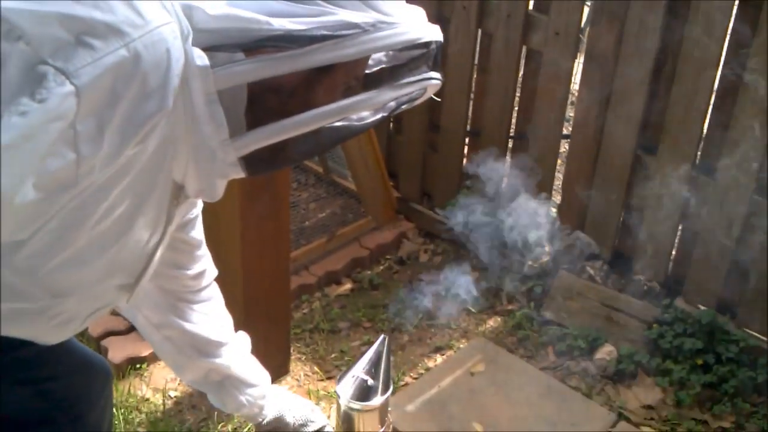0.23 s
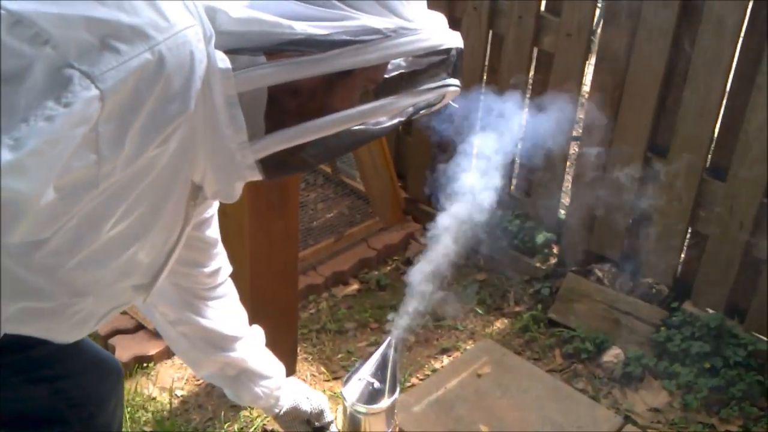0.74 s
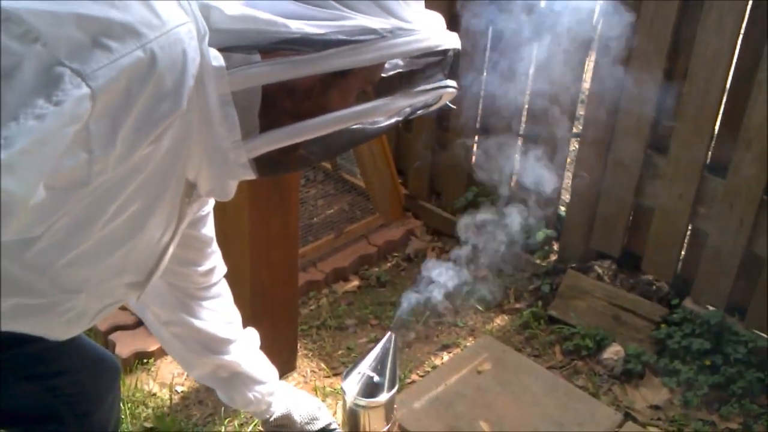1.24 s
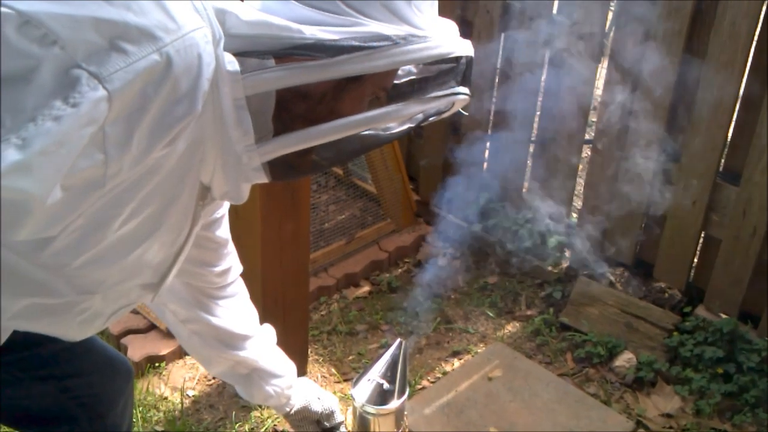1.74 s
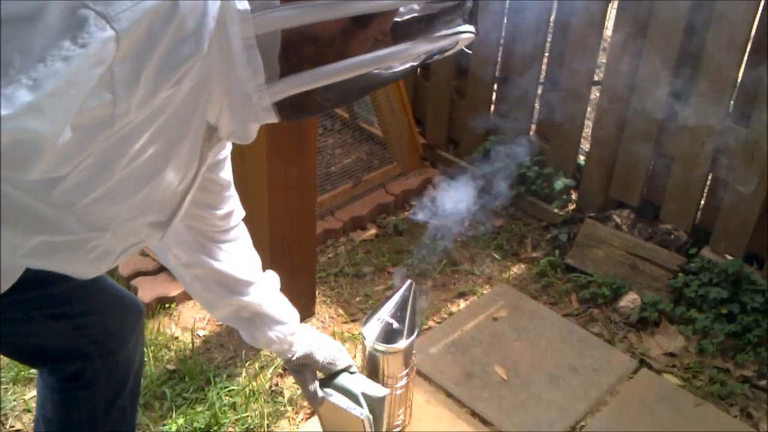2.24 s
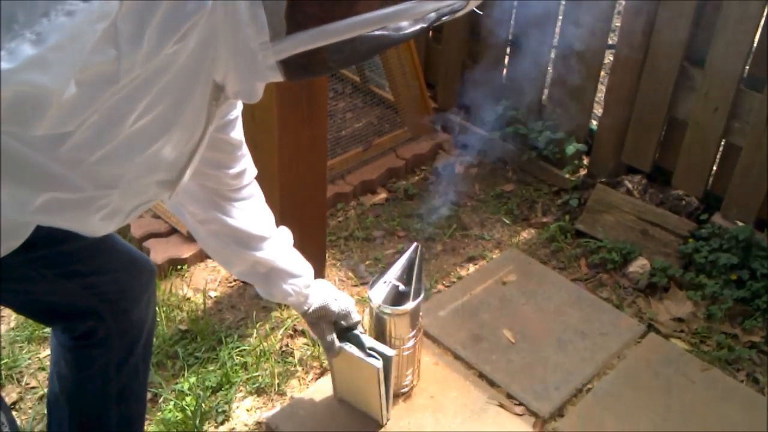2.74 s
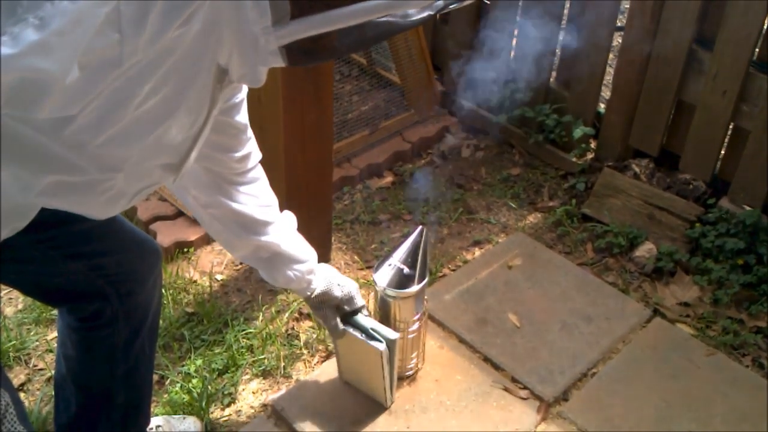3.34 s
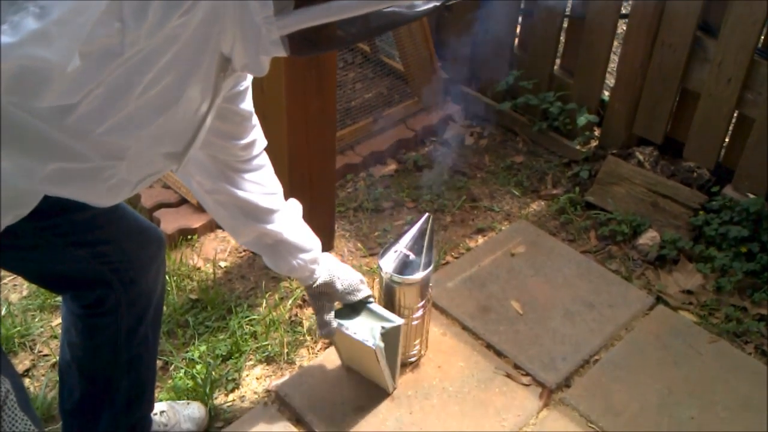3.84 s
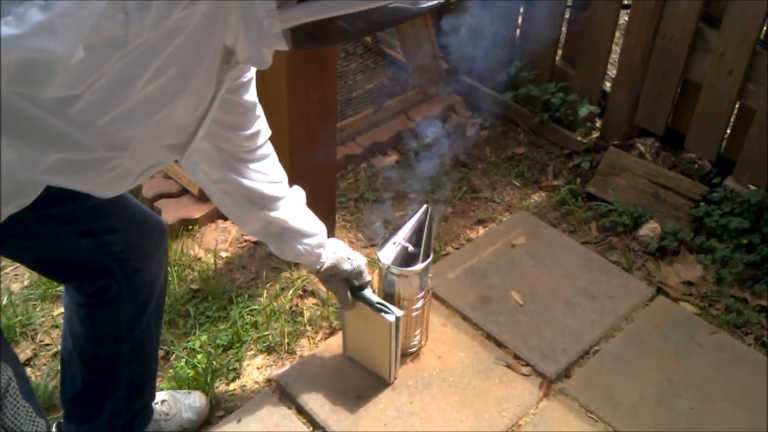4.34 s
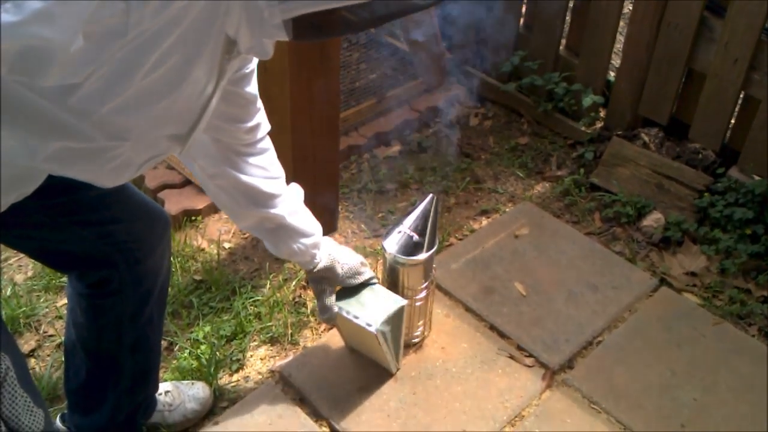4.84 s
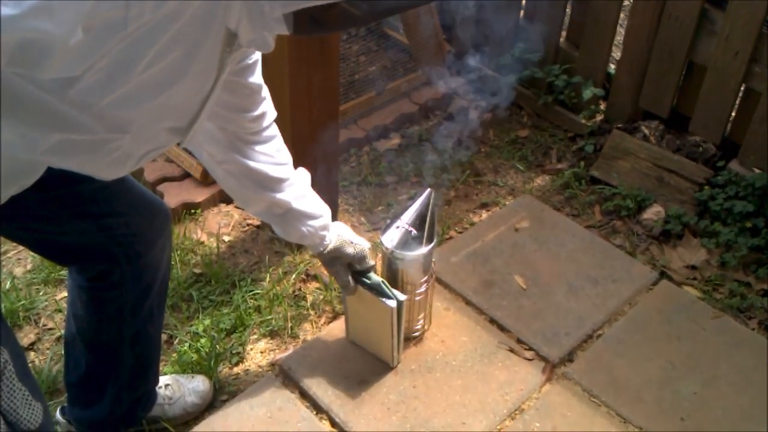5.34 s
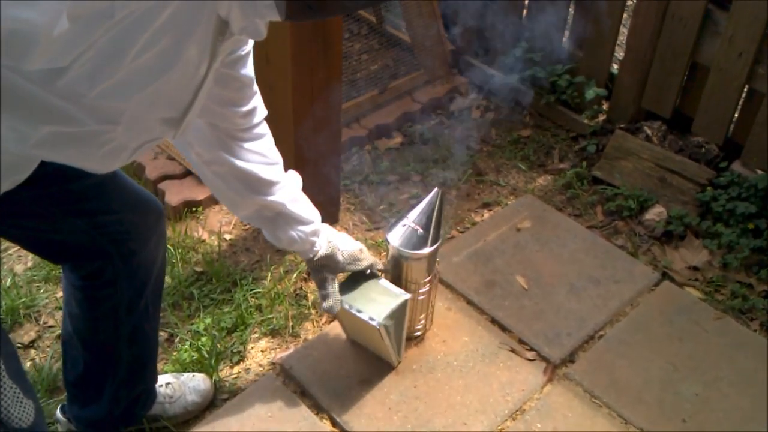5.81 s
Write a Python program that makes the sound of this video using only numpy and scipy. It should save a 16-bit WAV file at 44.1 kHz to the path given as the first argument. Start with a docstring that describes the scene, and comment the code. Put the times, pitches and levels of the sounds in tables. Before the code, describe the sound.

A hand bellows huffs breathy, hollow puffs of air outdoors, with hissing refills, stiff crackly snaps, tinny scrapes on stone and dull board knocks.

```python
"""A bee smoker is pumped in a fenced yard, over a low outdoor rumble that at times dips abruptly.
A squeeze is already under way: turbulent air hums in the can, roars in the spout and hisses through the fuel.
At once the can scrapes on a paving slab and rings modally, stiff folds snap and crinkle, and the boards knock.
Then the spring reopens the bellows, which hiss as they refill, and squeeze and refill alternate.
The lid buzzes early and again later; the wire guard rings once near the start; stick-slip creaks follow."""
import sys
import numpy as np
from scipy import signal
from scipy.fft import rfft, irfft, next_fast_len
from scipy.io import wavfile
from scipy.ndimage import map_coordinates

SR = 44100
rng = np.random.default_rng(int(sys.argv[2]) if len(sys.argv) > 2 else 0)


def store_wav(level_fs):
    """Save 16-bit WAV to argv[1]."""
    pcm = np.round(np.clip(np.atleast_2d(level_fs), -1, 1) * 32767)
    wavfile.write(sys.argv[1], SR, pcm.T.astype(np.int16))


N = 267731  # samples


def amp(db):
    """Level: amplitude ratio of a value in dB."""
    return 10 ** (np.asarray(db) / 20)


def unit(x):
    """Normalisation: x at rms 1."""
    return x / np.sqrt(np.mean(x ** 2) + 1e-20)


def along(points, hz):
    """Interpolation of (f/Hz, value) points on a logarithmic frequency axis."""
    f, v = np.transpose(points)
    return np.interp(np.log(hz + 1), np.log(f + 1), v)


def curve(rows):
    """Linear interpolation of (t/s, value) rows, one value per sample."""
    return np.interp(np.arange(N) / SR, *np.transpose(rows))


def wobble(rate):
    """Random modulation: a smooth curve through rate random knots a second."""
    knots = rng.standard_normal(int(N * rate / SR) + 4)
    return map_coordinates(knots, [np.arange(N) * rate / SR])


def filtered(x, response):
    """Linear filtering: the spectrum of x times a complex response of frequency."""
    m = next_fast_len(len(x) + SR // 4)
    hz = np.fft.rfftfreq(m, 1 / SR)
    return irfft(rfft(x, m) * response(hz), m)[:len(x)]


def coloured(x, spectrum):
    """Spectral shaping by (f/Hz, level/dB) points, at rms 1."""
    return unit(filtered(x, lambda hz: amp(along(spectrum, hz))))


def resonant(x, peaks):
    """Parallel second-order resonators, (f/Hz, width/Hz, level/dB) each."""
    def response(f):
        return sum(amp(db) * 1j * f * w / (c * c - f * f + 1j * f * w) for c, w, db in peaks)
    return filtered(x, response)


def noise():
    """White Gaussian noise."""
    return rng.standard_normal(N)


def grains(rate, spread_db):
    """Random impulse process: tiny impacts of random size and sign, rate a second, at rms 1."""
    struck = rng.random(N) < rate / SR
    sign = rng.choice([-1, 1], N)
    return unit(struck * sign * amp(spread_db * np.clip(noise(), -2, 2)))


def add(track, s, sound):
    """Superposition: mix a sound into the track at time s."""
    part = track[round(s * SR):][:len(sound)]
    part += sound[:len(part)]


def stroke(length, t60, rise):
    """Exponential envelope: it rises, holds for a length and dies away."""
    t = np.arange(SR // 2) / SR
    return (1 - np.exp(-t / rise)) * amp(-60 * np.maximum(t - length, 0) / t60)


def burst(hz, width, t60, seconds):
    """Damped resonance: a dying noise burst round hz, at rms 1 over its first seconds."""
    band = [(hz, width, 0)]
    decay = stroke(0.0019, t60, rise=0.00026)
    excitation = decay * rng.choice([-1., 1.], len(decay))
    sound = resonant(resonant(excitation, band), band)
    return sound / np.sqrt(np.mean(sound[:round(seconds * SR)] ** 2))


def ringing(modes):
    """Modal superposition: half a second of damped sines, at rms 1 over the first 10 ms."""
    t = np.arange(SR // 2) / SR
    sound = 0
    for hz, db, t60 in modes:
        phase = rng.random()
        # dividing by sqrt(t60) gives modes of equal table level equal energy
        sound = sound + amp(db - 60 * t / t60) / np.sqrt(t60) * np.sin(2 * np.pi * (hz * t + phase))
    return sound / np.std(sound[:SR // 100])


SPEED_POWER = 4.38  # sound pressure grows as this power of the air speed


def gust(start, length, peak):
    """Aeroacoustic power law: air speeds up, peaks and comes to rest; sound pressure is a power of its speed."""
    done = np.clip((np.arange(N) / SR - start) / length, 0, 1)
    skew = np.log(.5) / np.log(peak)  # puts the top of the sine at this share of the stroke
    return np.abs(np.sin(np.pi * done ** skew)) ** SPEED_POWER


# spectrum of the outdoor rumble: f/Hz, relative level per Hz/dB
YARD_SPECTRUM = [(15, -30.5), (30, -7.5), (57, -1.5), (90, -7), (150, -5.5), (300, -12.5), (450, -10.5),
                 (600, -16), (1000, -18), (1400, -23), (2200, -28), (4000, -32), (6600, -23.5),
                 (8000, -34.5)]
# course of the rumble, whose departures from its mean are scaled by the swing: t/s, level/dB
RUMBLE_COURSE = [(0.0, -41.5), (0.03, -39), (0.1, -46), (0.96, -41.5), (1.32, -51.5), (1.69, -44),
                 (3.2, -43.5), (3.26, -54), (3.53, -47.5), (3.57, -57.5), (3.99, -46.5), (5.29, -43.5),
                 (5.95, -48.5), (6.07, -44)]
YARD_DB, YARD_SWING = -42, 0.74  # mean level/dB; share of the course's departures that is followed


def yard():
    """Noise with a changing level: a low outdoor rumble that at times dips abruptly."""
    rumble_db = curve(RUMBLE_COURSE)
    swing_db = YARD_SWING * (rumble_db - rumble_db.mean())
    return coloured(noise(), YARD_SPECTRUM) * amp(YARD_DB + swing_db + 0.26 * wobble(9))


# squeezes of the bellows by hand: start t/s, length/s, peak flow level/dB, ceiling of the can's hum/dB,
# both before the source gains and the effect of force
SQUEEZES = [(-.25, 0.53, -40, -39), (0.416, 1.0, -44, -35), (1.556, 0.77, -39.5, -35.5),
            (2.466, 0.7, -32.5, -36.5), (3.451, 0.59, -35, -40.5), (4.373, .48, -28, -36),
            (5.249, 0.41, -25, -36.5)]
# turbulence of the jet: f/Hz, relative level per Hz/dB
JET_SPECTRUM = [(120, -33.5), (250, -2), (360, -1.5), (450, -3.5), (800, -1.5), (1400, -2.5), (2000, -12),
                (3100, -13.5), (4200, -6), (8000, -25)]
# resonances of can and spout in the air stream: f/Hz, width/Hz, relative level/dB
SPOUT_RESONANCES = [(703, 18, -7.5), (804, 110, 1.5), (870, 35, -3.5), (1032, 32, 1), (1173, 48, -7),
                    (1323, 43, -2), (1408, 27, -2.5), (1558, 21, -15), (1691, 44, -5), (1880, 49, -4.5),
                    (1956, 23, -5.5), (2173, 50, -11.5), (2500, 94, -7.5), (3720, 87, -12),
                    (4197, 42, -2.5)]
# air passing through the smouldering fuel: f/Hz, relative level per Hz/dB
FUEL_SPECTRUM = [(2000, -41), (3300, -29), (4150, -12), (4700, -7.5), (5400, -0.5), (6300, 4.5), (7100, 7),
                 (7600, 5), (8200, -27)]
# air in the can, bouncing on the spout: f/Hz, width/Hz, relative level/dB
CAVITY_RESONANCE = [(271.5, 34.3, 0)]
SQUEEZE_PEAK = 0.31  # share of a squeeze gone by when the air is fastest
HUM_ONSET_DB, FIRM_DB = -49.5, -26.5  # flow levels/dB: half drive of the hum, and a firm squeeze
HUM_GROWS, HISS_GROWS = .11, .22  # dB per dB of flow: the hum, and the hiss over the roar


def puffs():
    """Turbulent jet and Helmholtz resonance: the flow roars, hisses and hums, brighter when squeezed harder."""
    flow = amp(-120)  # a trace of flow keeps the logarithm finite
    humming = 0
    for start, length, db, hum_db in SQUEEZES:
        puff = amp(db) * gust(start, length, SQUEEZE_PEAK)
        # the cavity answers even a gentle flow and grows little beyond that
        drive = (puff / amp(HUM_ONSET_DB)) ** 1.55
        flow = flow + puff
        humming = humming + amp(hum_db) * drive / (1 + drive)
    force_db = 20 * np.log10(flow) - FIRM_DB

    jet = amp(-1.24) * coloured(noise(), JET_SPECTRUM)
    spout = amp(-1.5) * unit(resonant(noise(), SPOUT_RESONANCES))
    roar = jet + spout
    fuel = coloured(noise() + .5 * grains(1500, 3.3), FUEL_SPECTRUM)
    hiss = fuel * amp(3.5 + HISS_GROWS * force_db + 1.1 * wobble(40))
    hum = unit(resonant(noise(), CAVITY_RESONANCE)) * humming * amp(HUM_GROWS * force_db)
    return (roar + hiss) * flow * amp(1.44 * wobble(25)) + hum


def fabric(slips):
    """Band-pass resonance of the stiff fabric, excited by tiny slips, at rms 1."""
    band = [(6370, 2800, 0.0048)]  # f/Hz, width/Hz of each pass, level/dB
    return unit(resonant(resonant(slips, band), band))


def stray_ticks():
    """Random impulsive excitation: faint stray creases tick in the fabric."""
    return amp(-58.5) * fabric(grains(30, 4))


# the can's rim drags on the slab: t/s, level/dB, length/s, t60/s, weight of the low tones/dB;
# the level applies before the weighting
SCRAPES = [(0.041, -26, 0.0083, 0.065, -11), (0.052, -19.5, 0.0088, 0.055, 1.5),
           (0.066, -16.5, 0.021, 0.23, -3.5), (0.2434, -26, 0.0099, 0.093, -5.5),
           (0.277, -25, 0.035, 0.12, -1), (0.34, -25, 0.016, 0.17, -2), (2.489, -20, 0.0076, 0.061, -3.5),
           (2.5, -15.5, 0.01, 0.11, -6)]
# modes of the tin can: f/Hz, relative energy level/dB, t60/s
TIN_MODES = [(476.6, -12.5, 0.23), (746, -2.5, 0.1), (1319, 3, 0.09), (1770, -3.5, 0.42), (2070, -15, 0.31),
             (2314, -7.5, 0.4), (2500, -17, 0.37), (3154, -3.5, 0.19), (3413, -2.5, 0.19), (3610, -17, .22),
             (3883, -3, 0.2), (3990, -2.5, 0.11), (4434, -1, .16), (4780, -0.5, .16), (4900, -6, 0.12),
             (5450, -2, .2), (5690, -2.5, .15), (6065, -5.5, 0.17), (6300, -9, 0.15), (6800, -8, .18),
             (7270, 3.5, 0.067)]
# grit under the rim: f/Hz, relative level per Hz/dB
GRIT_SPECTRUM = [(150, -14.5), (350, -3.5), (900, -9.5), (2500, -8), (4000, -5.5), (5500, -3), (7200, 2),
                 (8200, -16.5)]


def scrapes():
    """Modal excitation by impact and friction: the rim strikes, then caught grit keeps the tin ringing."""
    out = np.zeros(N)
    for s, db, length, t60, weight_db in SCRAPES:
        tin = ringing(TIN_MODES)
        size = len(tin)
        drag = stroke(length, t60, rise=0.00076) * amp(1.0 * wobble(220)[:size])
        catches = drag * grains(3000, 1.5)[:size]
        ring = signal.fftconvolve(catches, tin / np.linalg.norm(tin))[:size]
        grit = drag * coloured(grains(4000, 1.85)[:size], GRIT_SPECTRUM)
        touch = amp(-5.5) * ring + amp(-1.5) * grit + amp(-5.0) * tin
        # a heavier touch sounds lower
        tilt = [(1500, weight_db), (4800, 0.0038)]  # f/Hz, level/dB
        add(out, s, amp(db) * filtered(touch, lambda hz: amp(along(tilt, hz))))
    return out


# folds of the bellows flip over; the tick at 0.27 s is a tap of the can's rim:
# t/s, level of the crack/dB, f/Hz, crinkle that follows re crack/dB, tap re crack/dB
SNAPS = [(0.044, -15.5, 6030, -7, -26.5), (.270, -30.5, 5400, -24, 1), (0.5223, -29.5, 6070, -11, -8),
         (1.23, -14, 5360, -22, -15.5), (1.253, -17.5, 5270, -25, -35), (1.7179, -17.5, 6230, -17, -21),
         (2.1253, -25.5, 6460, -12, -14), (2.283, -14.5, 6300, -7, -20.5), (2.39, -20.5, 6660, -12, -21),
         (2.502, -19.5, 6000, -16, -13), (2.655, -24, 6300, -1, -15), (2.835, -27, 6070, -1.5, -21),
         (3.2225, -25.5, 6900, -6, -16), (3.2432, -16.5, 6700, -5.5, -16), (3.2697, -22.5, 5900, -22, -34),
         (3.557, -18, 6040, -5.5, -15.5), (3.7142, -22.5, 5770, -15, -10), (4.1189, -14, 6100, 1, -16.5),
         (4.945, -21.5, 6900, -3, -2.5), (5.0086, -17.5, 6770, -6, -6), (5.4409, -9, 5670, -8.5, -25),
         (5.4855, -23, 6460, -1.5, -15), (5.717, -32, 6840, -16, -21), (5.811, -21, 6900, -4.5, -28),
         (5.929, -31.5, 7100, -4, -11.5)]
# the answer to a tap, mostly on the board, passed twice: f/Hz, width of each pass/Hz, level/dB
TAP_RESONANCE = [(1700, 4100, 0)]


def snaps():
    """Snap-through buckling: a fold flips with a crack, a sharp board tap and crinkles; one tick is a rim tap."""
    out = np.zeros(N)
    impulse = signal.unit_impulse(SR // 50, SR // 1000)
    tap = resonant(resonant(impulse, TAP_RESONANCE), TAP_RESONANCE)
    tap = tap / np.std(tap[:SR // 300])
    for s, db, hz, crinkle_db, tap_db in SNAPS:
        crack = burst(hz, width=2400, t60=.009, seconds=0.0018)
        crinkle = burst(hz, width=3900, t60=0.041, seconds=0.0026)
        add(out, s, amp(db) * (crack + amp(crinkle_db) * crinkle))
        add(out, s, amp(db + tap_db) * tap)
    return out


# knocks of the bellows boards: t/s, level before the mix of thud and body/dB, f/Hz, t60 of the body's drive/s
BUMPS = [(0.044, -20.5, 310, 0.058), (0.046, -25, 754, 0.17), (2.111, -34.5, 210, 0.14),
         (3.194, -31.5, 404, 0.13), (4.122, -29, 260, 0.076), (4.974, -29.5, 438, 0.19),
         (5.003, -27.5, 473, 0.11), (5.811, -25, 475, 0.19)]


def bumps():
    """Damped impact response: the boards knock dully at the end of their travel."""
    out, t = np.zeros(N), np.arange(SR // 2) / SR
    for s, db, hz, t60 in BUMPS:
        thud = np.sin(2 * np.pi * hz * t) * amp(-60 * t / (t60 / 4))
        body = burst(hz, width=1.18 * hz, t60=t60, seconds=0.024)
        add(out, s, amp(db) * (0.91 * thud + 0.62 * body))
    return out


# the spring opens the bellows: start t/s, length/s, peak level before taut drop and gain/dB, folds taut at t/s
REFILLS = [(.1, 0.71, -38.5, 0.48), (1.087, 0.51, -29.5, 1.2), (2.058, 0.63, -30.5, 2.35),
           (2.998, 0.52, -31, 3.32), (3.93, 0.58, -32.5, 4.2), (4.833, 0.49, -29, 5.13),
           (5.636, 0.54, -31.5, 5.82)]
# air drawn through the port: f/Hz, relative level per Hz/dB
INTAKE_SPECTRUM = [(100, -11), (280, 0.5), (650, -12.5), (1350, -4.5), (1900, -7), (2900, -5), (3500, -3.5),
                   (4000, 1.5), (4500, 3.5), (5400, 0), (6300, 1.5), (7300, 7), (8200, -15.5)]
REFILL_PEAK = 0.27  # share of a refill gone by when the air is fastest
TAUT_DB, TAUT_S = -5.5, .01  # drop of the intake once the folds are taut/dB, and its duration/s


def refill():
    """Turbulent inflow: the opening bellows suck air through a narrow port, less once the folds pull taut."""
    t = np.arange(N) / SR
    flow = 0
    for start, length, db, taut in REFILLS:
        tautness = np.clip((t - taut) / TAUT_S, 0, 1)
        flow = flow + amp(db + TAUT_DB * tautness) * gust(start, length, REFILL_PEAK)
    hiss = coloured(noise() + .4 * grains(700, 3.9), INTAKE_SPECTRUM)
    return hiss * flow * amp(0.7 + 1.3 * wobble(35))


# the loose lid chatters: t/s, level before flutter/dB
CHATTERS = [(0.281, -24.5), (0.294, -29), (0.342, -24), (1.233, -31), (1.253, -33), (5.443, -25.5)]
# modes of the lid: f/Hz, relative energy level/dB, t60/s
LID_MODES = [(4600, -6.5, 0.16), (4890, -5, 0.12), (5560, -2, 0.071), (5600, -1, 0.078)]


def lid():
    """Modal ringing with rapid random modulation: a jolt makes the lid buzz briefly against its seat."""
    out = np.zeros(N)
    for s, db in CHATTERS:
        add(out, s, amp(db) * ringing(LID_MODES))
    return out * amp(2.3 * wobble(350))


# modes of the wire guard round the can: f/Hz, level/dB, t60/s
GUARD_MODES = [(1896, -44.5, 1.9), (2130, -47, 0.52), (2220, -37.5, 0.43), (2891, -48, 1.1)]
GUARD_AT = 0.343  # s, when it is jarred


def guard():
    """Lightly damped modes: the wire guard, jarred once, rings on thinly."""
    out, t = np.zeros(N), np.arange(SR) / SR
    wire = sum(amp(db - 60 * t / t60) * np.sin(2 * np.pi * hz * t) for hz, db, t60 in GUARD_MODES)
    add(out, GUARD_AT, wire)
    return out


# fabric and glove creak: t/s, level/dB, length/s
CREAKS = [(0.489, -35.5, .01), (0.57, -28, 0.012), (0.641, -35.5, 0.0075), (0.962, -36.5, .006),
          (1.355, -33.5, 0.0036), (1.828, -31, 0.016), (2.36, -32, 0.014), (2.395, -22, 0.0083),
          (3.816, -35.5, 0.022), (4.2418, -28.5, 0.017), (5.011, -18, 0.0096), (5.119, -37, 0.016),
          (5.953, -35, .011)]


def creaks():
    """Stick-slip friction: stiff fabric rubs under the glove in short grainy bursts."""
    rubbing = np.zeros(N)
    for s, db, length in CREAKS:
        add(rubbing, s, amp(db) * stroke(length, t60=0.044, rise=0.0024))
    return rubbing * fabric(grains(5100, 2.1))


# diffuse decay of the yard: f/Hz, t60/s
FENCE_DECAY = [(200, 0.34), (2000, 0.24), (8000, 0.17)]


def echoes(x):
    """Early reflection and diffuse decay: boards return two quick copies, fence and walls a short tail."""
    hz, t, z = signal.stft(rng.standard_normal(SR // 3), SR, nperseg=256)
    decay = amp(-60 * t / along(FENCE_DECAY, hz)[:, None])
    tail = signal.istft(z * decay, SR, nperseg=256)[1]
    delayed = np.pad(x, (SR // 200, 0))  # the tail starts 5 ms late
    diffuse = signal.fftconvolve(delayed, tail / np.linalg.norm(tail))[:N]
    # reflections after 4.1 and 5.1 ms
    early = filtered(x, lambda f: np.exp(-2j * np.pi * f * .0041) + np.exp(-2j * np.pi * f * .0051))
    return amp(-10.5) * diffuse + amp(-20.5) * early


def scene():
    """Linear superposition: the smoker, its echoes and the yard."""
    smoker = puffs() + stray_ticks() + scrapes() + snaps() + bumps() + refill() + lid() + guard() + creaks()
    return (yard() + smoker + echoes(smoker))[None]


TOP_HZ = 8000  # upper band limit


def record(dry):
    """Saturation and band limiting: peaks are rounded off below 0.8, then a steep low-pass acts."""
    rounded = dry / (1 + np.abs(dry / .8) ** 4) ** (1 / 4)
    return np.array([filtered(x, lambda hz: 1 / np.sqrt(1 + (hz / TOP_HZ) ** 130)) for x in rounded])


dry = scene()
out = record(dry)
store_wav(out)
```